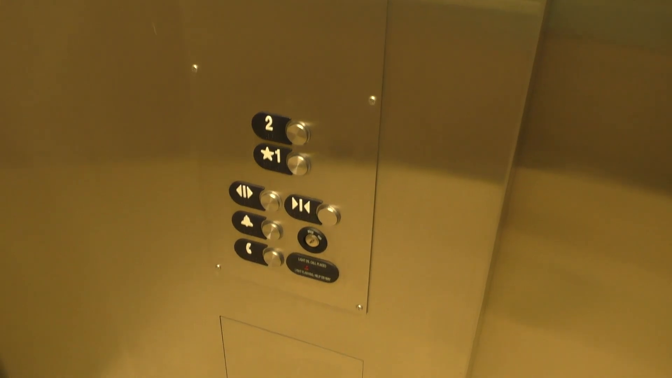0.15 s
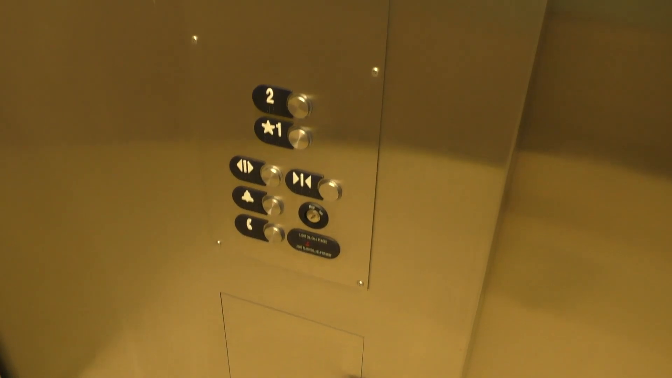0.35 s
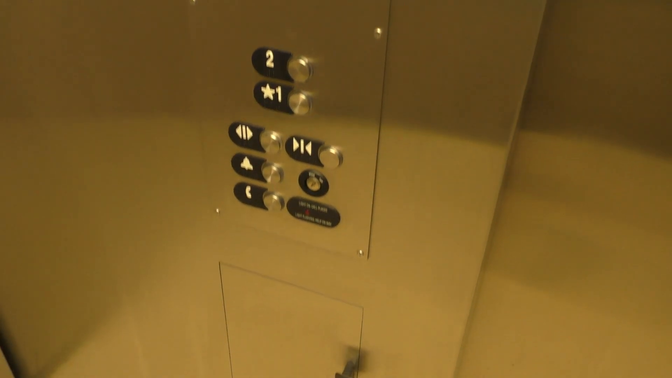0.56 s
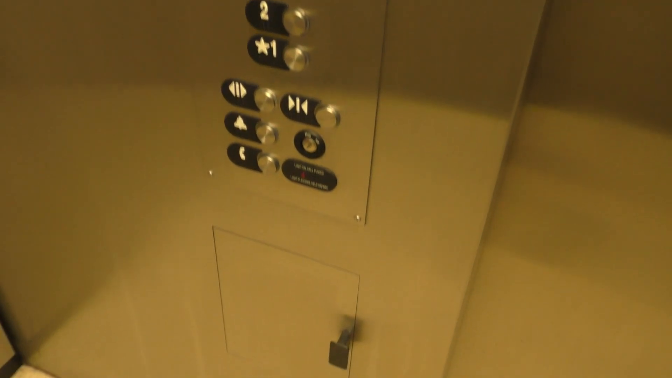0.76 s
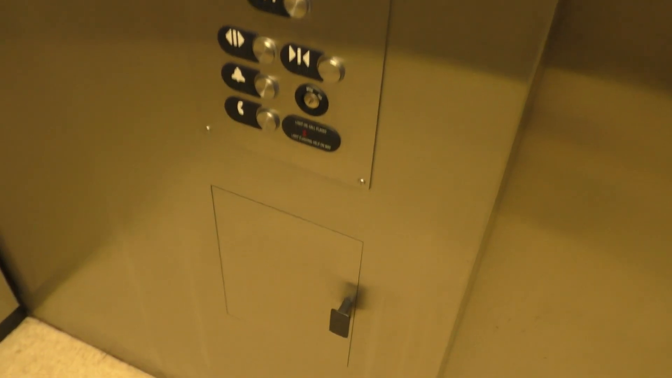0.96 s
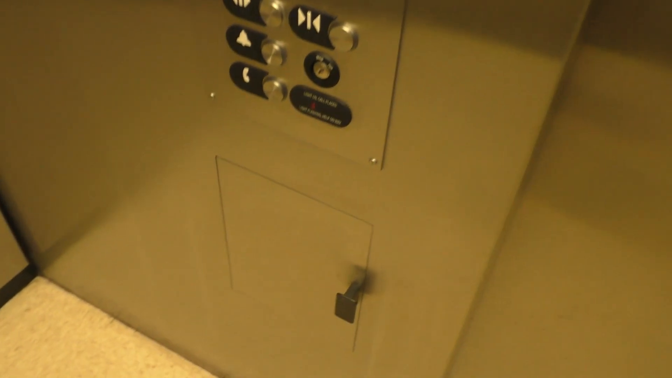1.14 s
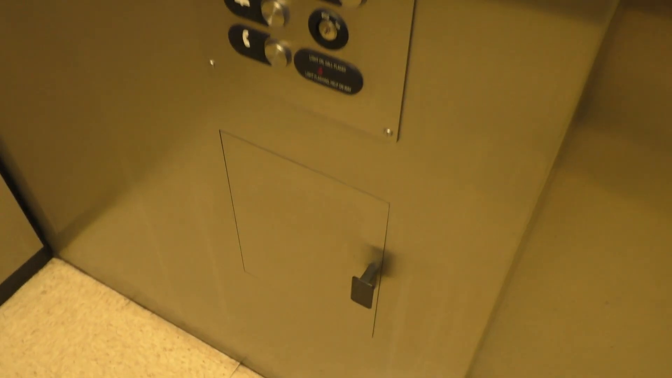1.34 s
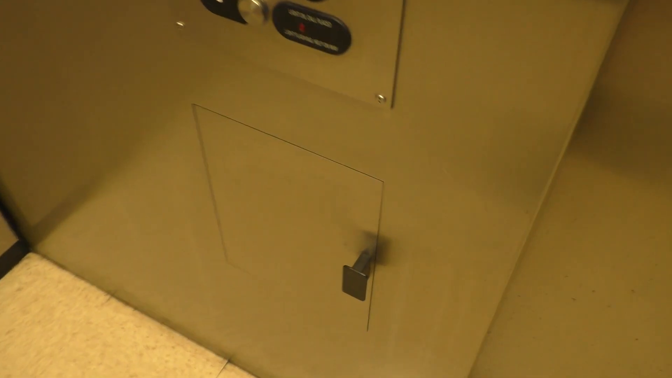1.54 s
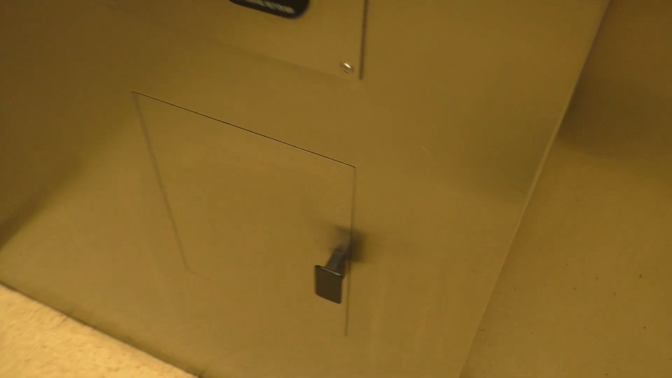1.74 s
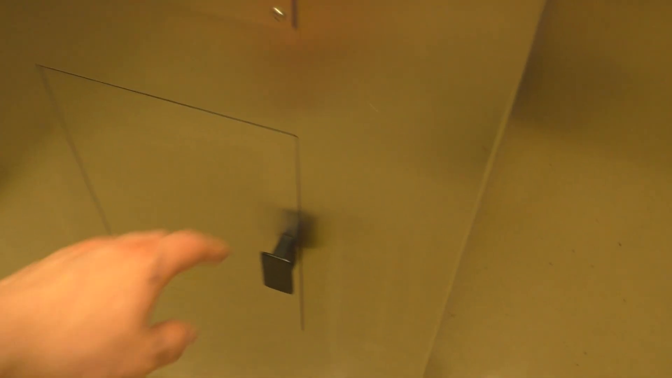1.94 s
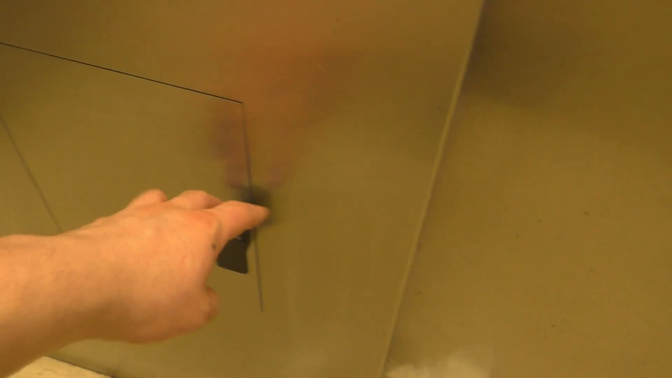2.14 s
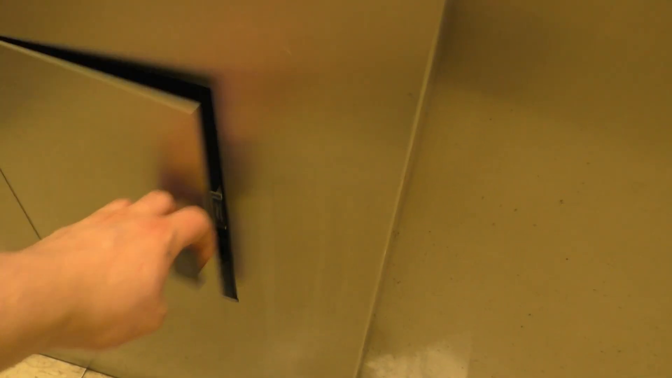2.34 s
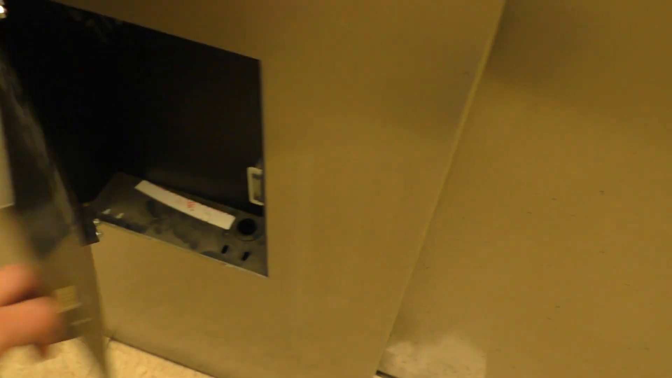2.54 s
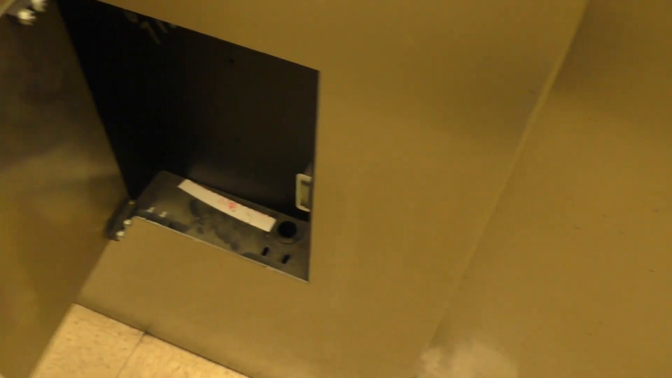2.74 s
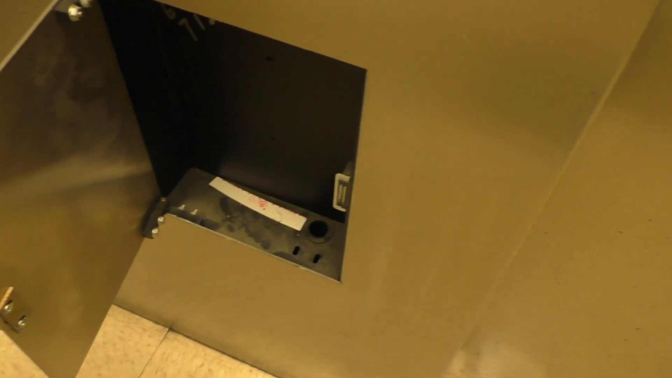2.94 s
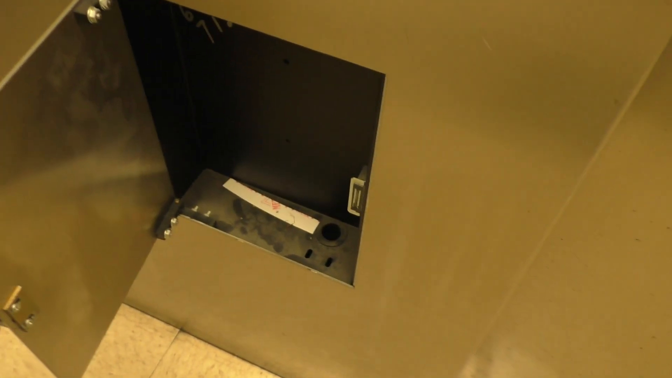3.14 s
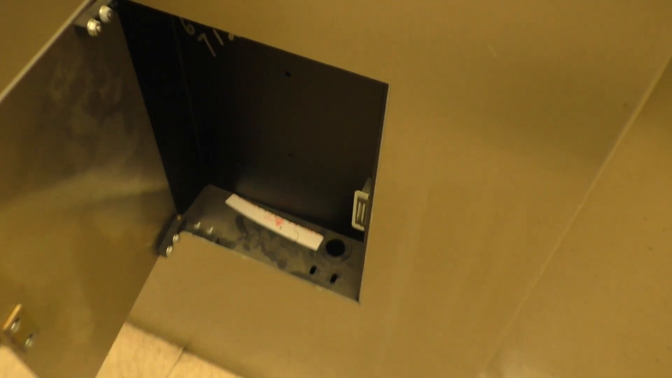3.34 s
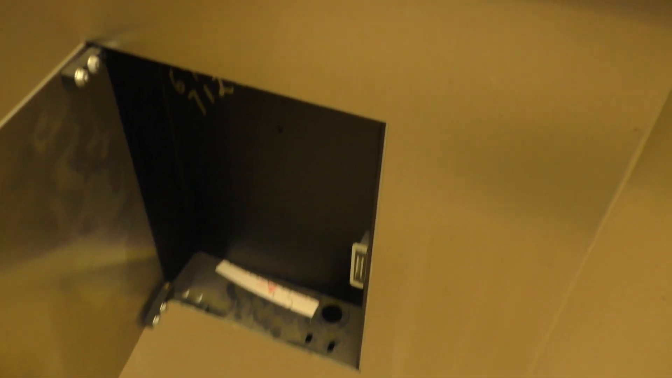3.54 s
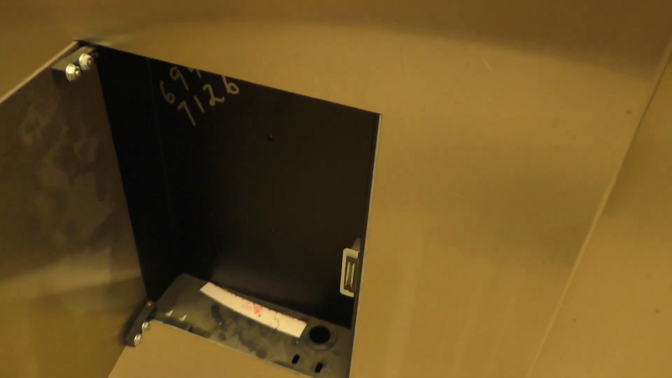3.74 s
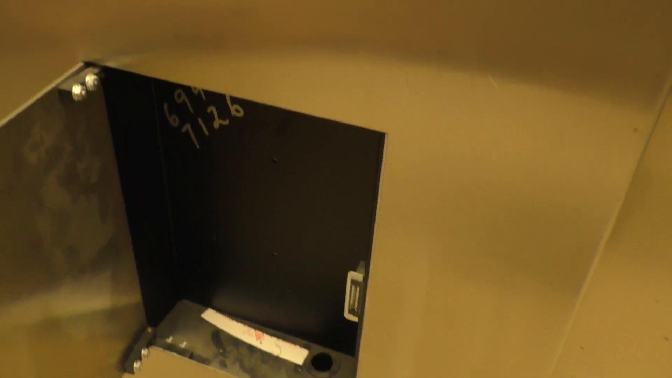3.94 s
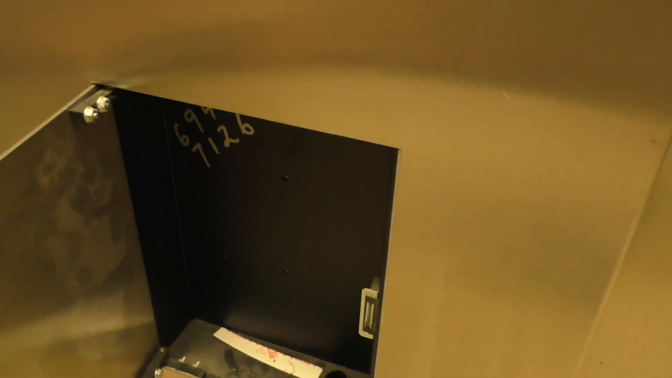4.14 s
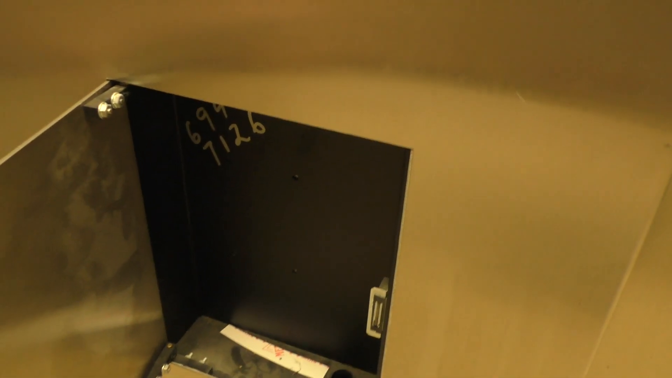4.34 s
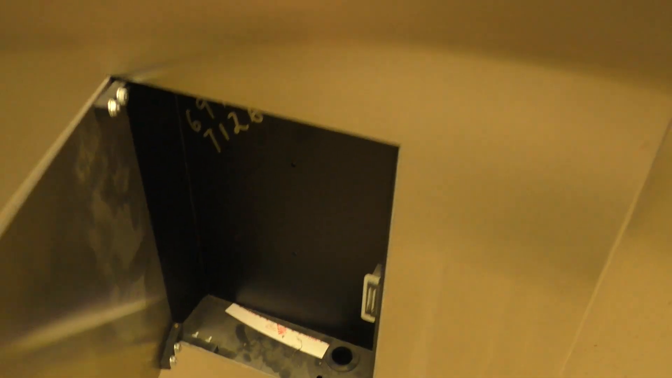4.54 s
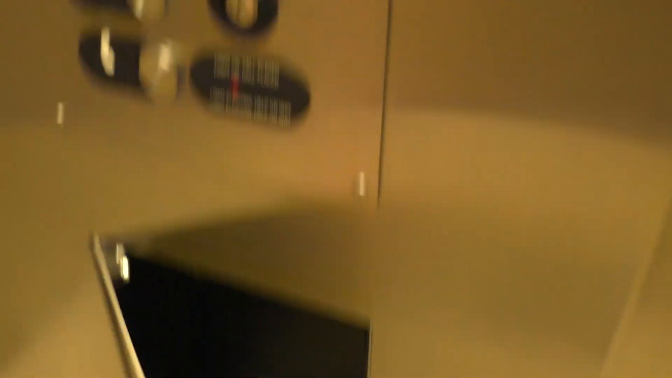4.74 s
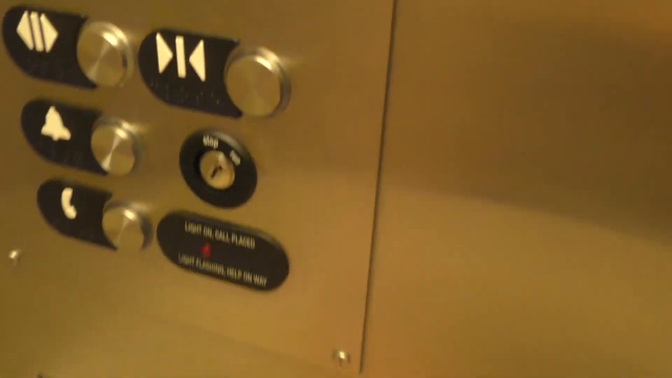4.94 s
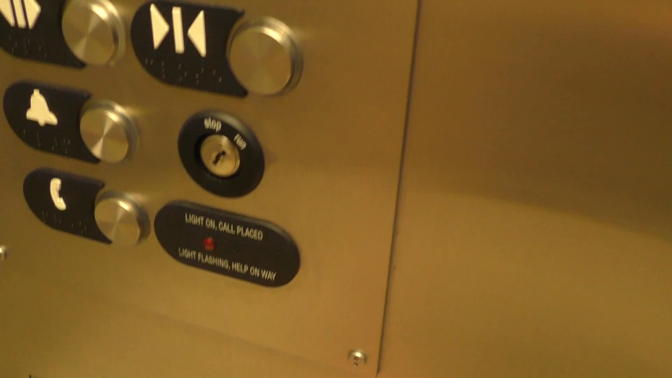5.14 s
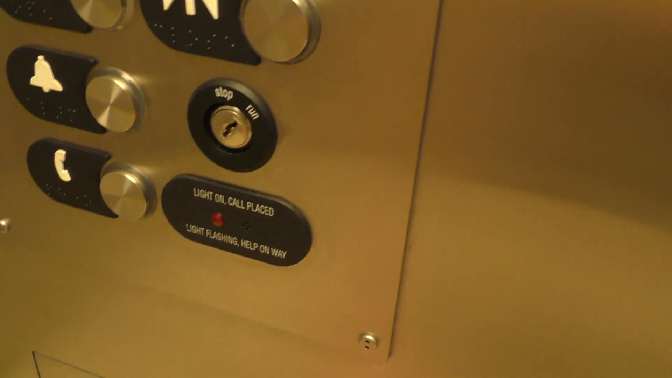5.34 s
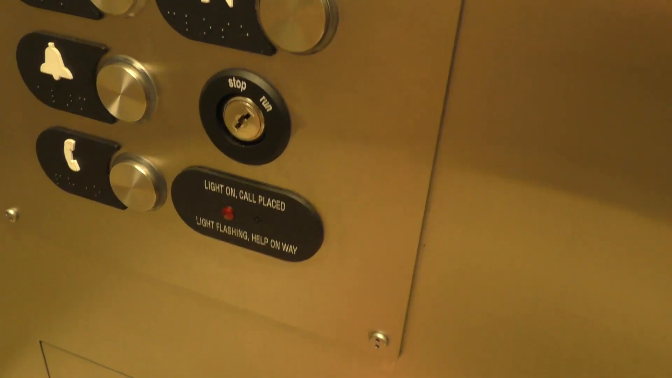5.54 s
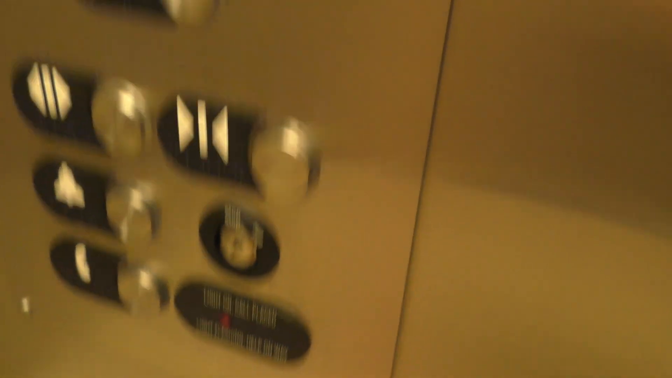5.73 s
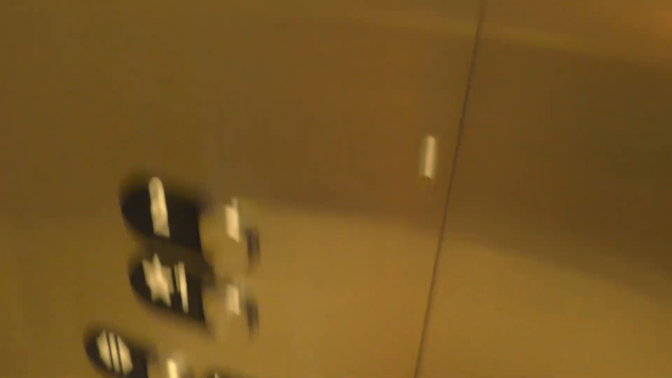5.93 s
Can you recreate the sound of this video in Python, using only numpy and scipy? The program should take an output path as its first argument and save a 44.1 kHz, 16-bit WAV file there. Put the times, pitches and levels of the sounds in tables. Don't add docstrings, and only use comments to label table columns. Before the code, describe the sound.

Faint fan hum, shaft rumble and slight microphone hiss fill a reverberant metal lift car. Early scuffs and a couple of hard foot knocks lead to a tiny catch click, then a thin steel cabinet door bursts loose with rapid hollow bangs and a clank. Only small taps, sleeve movement and dull camera handling bumps follow. Near the end comes a quick rough hinge squeak and a loud metallic slam with a fading ring, all within arm's reach.

```python
import sys
import numpy as np
from scipy import signal
from scipy.fft import rfft, irfft, next_fast_len
from scipy.io import wavfile
from scipy.ndimage import map_coordinates

SR = 44100
rng = np.random.default_rng(int(sys.argv[2]) if len(sys.argv) > 2 else 0)


def volts(x):
    e = np.asarray(x, float) / 20
    return 10 ** e


def unload_audio(sound):
    columns = np.transpose(np.atleast_2d(sound))
    steps = np.round(np.clip(columns, -1, 1) * 32767)
    wavfile.write(sys.argv[1], SR, steps.astype(np.int16))


N = 268304
ECHO = 31500
TOP_HZ = 16300
HISS_DB = -65
AIR_PAN_DB = -1
RUMBLE_DB, RUMBLE_FOLLOWS = -50, 0.21
CLOTH_DB, CLOTH_FOLLOWS = -74, 1.17
STICK_S, STICK_DB = .0021, -12

# (time [s], level [dB])
STIR = [(0, -47), (.12, -52), (.3, -49), (.8, -60), (.87, -56.5), (1.1, -62), (1.16, -56.5), (1.3, -58),
        (1.72, -51.5), (2.07, -55), (2.2, -50.5), (3.25, -62.5), (3.4, -64.5), (3.6, -62.5), (4.55, -63.5),
        (4.67, -59.5), (4.76, -61.5), (5.15, -58)]
# (time [s], peak level [dB], rise [s], fall [s])
RUSTLES = [
    (.02, -71, 0.016, 0.066),
    (.87, -77, 0.062, 0.036),
    (.982, -76, 0.032, .1),
    (1.158, -61, 0.036, .12),
    (1.66, -62, 0.51, 1),
    (2.2, -74, 0.033, 0.22),
    (3.599, -72, 0.21, 0.9),
    (3.95, -81, .08, .08),
    (4.7, -74, .015, 0.1),
    (5.12, -75, 0.68, 0.69),
]
# (frequency [Hz], level [dB])
HUM = [(118.4, -60), (253.0, -66.5), (360.7, -67.5), (2401, -87), (2519, -84), (4678, -86.5),
       (10966, -86.5), (11693, -86), (12425, -94.5), (15703, -93)]
# (frequency [Hz], density [dB per Hz])
RUMBLE = [(8.8, -34), (15, 6), (42, 0), (86, -7.5), (122, -4.5), (150, -12.5), (251, -13), (282, -17),
          (500, -26), (650, -62.5), (1100, -120)]
# (frequency [Hz], density [dB per Hz])
SHUFFLE = [(120, -31), (200, 5), (302, -21), (353, 0.5), (407, -9), (519, -4.5), (565, -6), (971, -9.5),
           (6000, -29), (7800, -56), (13200, -120)]
# (frequency [Hz], density [dB per Hz])
CLOTH = [(1500, -10), (3000, -4.5), (9000, -6.5), (12000, -19), (16000, -36)]
# (frequency [Hz], density [dB per Hz])
HISS = [(350, -29), (600, 0), (884, -13), (934, -33), (2170, -14), (2460, -19.5), (3330, -17.5),
        (11400, -14), (16300, -11)]

# (frequency [Hz], likeness [-1 to 1])
AIR_LIKENESS = [(60, 0.36), (240, 0.38), (950, 0.8), (3770, 0.46), (15000, 0.05)]
# (frequency [Hz], likeness [-1 to 1])
WALL_LIKENESS = [(60, -0.024), (120, 0.72), (240, 0.59), (480, 0.67), (950, 0.67), (1890, 0.81),
                 (3770, 0.5), (7520, 0.29), (15000, -0.3)]
# (frequency [Hz], t60 [s])
CAR = [(60, 1), (160, 0.92), (420, 1), (1100, 0.78), (2900, 0.51), (7700, 0.52), (14000, 0.27)]
# (low edge [Hz], high edge [Hz])
BANDS = [(60, 300), (400, 1500), (2000, 5000), (6000, 14000)]
SPREAD = [-1.5, -.3, .25, 1.2]

# (time [s], peak level [dB], weight [dB], edge [dB], contact length [s])
SCUFFS = [(.038, -40.5, -10, -36, 0.053), (.203, -39.5, -10, -43, 0.0049), (.334, -25, -23.5, -11, .017),
          (.379, -23.5, -13, -15.5, 0.016), (.439, -28.5, -1, -22, 0.0054), (.564, -51, 13, 6.5, 0.011),
          (1.249, -52, 10.5, 1, 0.013), (1.334, -54.5, -12, 2, .015), (1.47, -52, -20, -1, .03),
          (1.588, -56, -8, 3, .004), (1.645, -43, 4.5, -2.5, 0.0054), (2.129, -44, -36, -2.5, 0.015),
          (2.209, -46, -6, 3.5, .0069), (4.704, -45, -12, -67, 0.027), (5.129, -49, 1, -27, .015),
          (6.021, -42, -9, -8.5, 0.012)]
# (time [s], peak level [dB], weight [dB], edge [dB], contact length [s])
SCRAPES = [
    (.395, -38, -5, -14, .01),
    (1.39, -55, -10, -14, 0.016),
    (1.478, -53, -8, -12, 0.011),
    (1.512, -50, -10, -14, .012),
    (1.555, -56, -10, -14, .01),
]
# (time [s], peak level [dB], weight [dB], edge [dB], contact length [s])
KNOCKS = [
    (.973, -42, -13, -18, 0.021),
    (1.149, -49.5, -9, 3, 0.024),
    (1.374, -38.5, -38, -39, 0.0022),
    (1.606, -28.5, -31, -30, 0.0011),
    (3.038, -55.5, -15, -6, .0025),
    (3.29, -53, -14, -51, .003),
    (3.558, -62, 35, -26, 0.0034),
    (4.669, -49, 9, 0, 0.004),
    (4.8, -47.5, -9, -44, 0.0046),
]
# (time [s], peak level [dB], weight [dB], edge [dB], contact length [s])
JOLTS = [
    (1.25, -63, 24, -30, 0.018),
    (1.36, -60, 24, -30, 0.014),
    (1.6, -53, 24, -30, .02),
    (1.68, -56.5, 23, -30, 0.013),
    (2.64, -49, 28, -30, 0.027),
    (3.3, -62, 26, -30, .02),
    (3.55, -57, 29, -30, 0.0074),
    (5.26, -58, 22, -32, 0.023),
]
# (time [s], peak level [dB], weight [dB], edge [dB], contact length [s])
HEEL = [
    (1.623, -37.5, -10, -26, .002),
    (1.652, -37, -12, -33, 0.0033),
]
# (time [s], peak level [dB], weight [dB], edge [dB], contact length [s])
CATCH = [
    (2.2605, -35, -2, 1, 0.0011),
    (2.52, -46, -13.5, 8.5, .004),
]
# (time [s], peak level [dB], weight [dB], edge [dB], contact length [s])
POP = [
    (2.341, -43, 9, -20, .0076),
    (2.367, -28.5, -14, -40, 0.011),
    (2.378, -24, -11, -41, .004),
    (2.3825, -13.5, -16, -12.5, .003),
    (2.39, -10, -23, -16, 0.0062),
    (2.396, -6.5, -19, -39.5, 0.0075),
    (2.424, -7, -21, -40.5, 0.0028),
    (2.448, -11.5, -7.5, -28.5, 0.017),
    (2.518, -13.5, -5, -34.5, 0.005),
]
# (time [s], peak level [dB], weight [dB], edge [dB], contact length [s])
SHIFTS = [
    (2.62, -46, 7, -42, 0.028),
    (5.02, -55, 13, -40, .02),
    (5.2, -58, 21, -40, 0.047),
]
# (time [s], peak level [dB], weight [dB], edge [dB], contact length [s])
STOP = [
    (2.729, -28.5, -3.5, 0, 0.00082),
    (2.763, -22, -4, -28.5, 0.03),
    (2.909, -44, 0, -35, .004),
    (4.841, -55.5, 17, 9.5, 0.0045),
    (4.96, -65, 17, 14, 0.006),
]
# (time [s], slip rate [Hz], level [dB])
HINGE = [
    (5.273, 685, -52),
    (5.283, 648, -38),
    (5.294, 680, -30),
    (5.308, 701, -25),
    (5.338, 672, -29),
    (5.36, 695, -21),
    (5.38, 635, -17),
    (5.43, 625, -23),
    (5.512, 628, -25),
]
STICKS = [5.2875, 5.3, 5.326, 5.341, 5.371, 5.389, 5.404, 5.441, 5.458, 5.472]
# (time [s], partial [multiple],
# level [dB], half length [s])
GRIPS = [(5.282, 2, -58, .003), (5.285, 3, -50, .005), (5.293, 3, -45, .005), (5.296, 2, -46, .006),
         (5.295, 3.9, -53, .004), (5.305, 3.8, -52, .004), (5.318, 2, -37, .006), (5.322, 3, -38, .004),
         (5.322, 4.6, -52, .004), (5.329, 2, -38, .003), (5.33, 4, -50, .01), (5.326, 7, -62, .008),
         (5.333, 3, -44, .005), (5.345, 2, -36, .007), (5.346, 3, -45, .004), (5.362, 3.4, -42, .004),
         (5.39, 4.3, -38, .003)]
# (time [s], peak level [dB], weight [dB], edge [dB], contact length [s])
TOUCH = [
    (5.355, -19, -3, -33, .008),
    (5.365, -16, -8, -40, .008),
    (5.3735, -16, -19, -6.5, 0.0044),
    (5.392, -13.5, -2.5, -25, 0.0055),
    (5.445, -29, -11, -27, .006),
]
# (time [s], peak level [dB], weight [dB], edge [dB], contact length [s])
SLAM = [
    (5.5135, -14, -64, 0, 0.012),
    (5.517, -14, -16, -18.5, 0.019),
    (5.522, -3.5, -19.5, -7, 0.0023),
    (5.56, -8.5, -6.5, -23, .006),
]

# (frequency [Hz], level [dB], t60 [s])
FLOOR = [(119, -10, 1.7), (171.7, -1, 1.25), (407, 2.5, 0.52), (508, -15, 1.8), (554, 2, 0.25),
         (683, -1, 0.75), (777, -5.5, 0.43)]
# (frequency [Hz], level [dB], t60 [s])
SILL = [(1030, -6, .25), (1340, -8, .3), (1560, -12, .2), (2700, -18, .2)]
# (frequency [Hz], level [dB], t60 [s])
WALLS = [(112, -4, .4), (281, -3, .75), (462, -2, .35), (511, -14, .6), (616, -8, .7), (701, -7, .7),
         (805, -13, .6), (1001, -8, .55), (1270, -8, .5), (1464, -17, .5), (1900, -22, .45),
         (2067, -15, .2), (2600, -21, .3), (2950, -20, .25)]
# (frequency [Hz], level [dB], t60 [s])
DOOR = [(180, -3, .6), (284, -9, .9), (495, -13, 1), (1384, -12, .6), (1690, -5, .65), (1880, -12, .3),
        (2040, -10, .2), (2730, -3, .25), (3240, -15, .4), (3400, -4, .15), (4020, -16, .4),
        (4300, -14, .5), (5570, -16, .35), (6570, -18, .3)]
# (frequency [Hz], level [dB], t60 [s])
FRAME = [(113, -7, .4), (300, -8, .5), (459, -8, .8), (578, -12, .6), (624, -10, .35), (870, -8, .7),
         (1020, -12, .3), (1283, -15, .6), (1497, -22, .6), (1750, -18, .15), (3480, -27, .2),
         (4165, -27, .5), (4775, -29, .45)]
# (frequency [Hz], density [dB per Hz])
THUD = [(24, -41), (40, -12), (134, -13), (168, -11), (264, -3), (307, -2.5), (721, -9.5), (882, -9.5),
        (9620, -41), (16300, -42.5)]
# (frequency [Hz], density [dB per Hz])
GRIT = [(60, -30), (500, -14), (1500, 0), (2300, 1), (3000, -10), (4200, -16), (16300, -45)]
# (frequency [Hz], density [dB per Hz])
JOLT = [(24, 14), (70, 20), (110, 2), (400, 2), (1500, -30), (16300, -80)]
# (frequency [Hz], density [dB per Hz])
TICK = [(59, -33), (100, 2), (297, 7.5), (464, -14), (1600, -18.5), (1940, -14.5), (2500, -16), (3750, -8),
        (5620, -24.5), (6670, -18), (12100, -33.5), (15000, -28), (16300, -41)]
# (frequency [Hz], density [dB per Hz])
STEEL = [(24, -59), (40, -6), (107, -6), (221, -2.5), (277, 0), (415, -15.5), (459, 1.5), (561, -9.5),
         (704, -1.5), (1290, -15.5), (1650, -19.5), (8700, -45.5), (14400, -59), (16300, -78)]
# (frequency [Hz], density [dB per Hz])
CLANK = [(24, -51), (40, -12), (186, -3), (245, -25), (284, -1), (348, -9), (482, 2), (1460, -9),
         (1700, -9.5), (2290, -12), (4200, -16.5), (5000, -27), (5670, -21), (16300, -53)]
# (frequency [Hz], density [dB per Hz])
BANG = [(24, -38), (40, -8.5), (109, -1.5), (339, 1), (447, 3), (507, -1.5), (882, -2.5), (2350, -23),
        (8490, -26.5), (14400, -36), (16300, -39.5)]


def unit(x):
    return x / np.sqrt(np.mean(x ** 2) + 1e-20)


def along(points, hz):
    f, v = np.transpose(points)
    return np.interp(np.log(hz + 1), np.log(f + 1), v)


def curves(rows):
    s, *columns = np.transpose(rows)
    return [np.interp(np.arange(N) / SR, s, column) for column in columns]


def wobble(rate):
    coarse = np.arange(0, N + 16, 16)
    knots = rng.standard_normal(int(N * rate / SR) + 4)
    return np.interp(np.arange(N), coarse, map_coordinates(knots, [coarse * rate / SR]))


def stereo(pair, gain, alike):
    n = pair.shape[1]
    hz = np.fft.rfftfreq(n, 1 / SR)
    turn = np.arccos(np.clip(along(alike, hz), -1, 1)) / 2
    mid, side = irfft(rfft(pair) * gain(hz) * [np.cos(turn), np.sin(turn)], n)
    return np.array([mid + side, mid - side])


def rush(spectrum):
    pair = rng.standard_normal((2, N))
    pair = np.pad(pair, ((0, 0), (0, next_fast_len(N, True) - N)))
    return unit(stereo(pair, lambda hz: volts(along(spectrum, hz)), AIR_LIKENESS)[:, :N])


def background():
    stir_db, = curves(STIR)
    swing_db = stir_db - stir_db.mean()
    t = np.arange(N) / SR
    brush = 0
    for s, db, rise, fall in RUSTLES:
        brush = brush + volts(db - 20 * np.where(t < s, (s - t) / rise, (t - s) / fall))
    rumble_db = RUMBLE_DB + RUMBLE_FOLLOWS * swing_db + 2.2 * wobble(17) + 0.91 * wobble(4.12)
    rumble = volts(rumble_db) * rush(RUMBLE)
    shuffle = volts(stir_db + 0.56 * wobble(11)) * rush(SHUFFLE)
    cloth_level = volts(CLOTH_DB + CLOTH_FOLLOWS * swing_db) + brush
    cloth = cloth_level * volts(1.24 * wobble(16)) * rush(CLOTH)
    hum = 0
    for hz, db in HUM:
        level = volts(db + 4.5 + 1.36 * wobble(6.6))
        hum = hum + level * np.sin(2 * np.pi * hz * t + 1.49 * wobble(14))
    pan = volts(np.array([[.5], [-.5]]) * AIR_PAN_DB)
    return pan * (rumble + shuffle + cloth + hum) + volts(HISS_DB) * rush(HISS)


def ring(modes, colour, split_hz):
    t = np.arange(ECHO) / SR
    hz, db, t60 = np.transpose(modes)[..., None]
    places = np.reshape(SPREAD, (4, 1, 1)) + .2 * rng.standard_normal((4, len(modes), 1))
    offsets = (split_hz + .006 * hz) * places
    cluster = np.exp(2j * np.pi * (hz + offsets) * t).sum(axis=0) / 2
    return volts(db - along(colour, hz) - 60 * t / t60) * cluster


def car():
    hz, frame, z = signal.stft(rng.standard_normal((2, ECHO)), SR, nperseg=256)
    decay = volts(-60 * frame / along(CAR, hz)[:, None])
    tail = signal.istft(z * decay, SR, nperseg=256)[1][:, :ECHO]
    return tail * (1 - np.exp(-np.arange(ECHO) / SR / 0.00022))


def strikes(events, colour, modes, direct_db, crack_db, ring_db, clack_db, follows, soft=False):
    lead = 900
    out = np.zeros((2, N + SR))
    centres = np.sqrt(np.prod(BANDS, axis=1))
    usual = along(colour, centres) + 10 * np.log10(np.diff(BANDS)[:, 0])
    panels = ring(modes, colour, split_hz=2.81)
    fade_in = np.clip(np.arange(-lead, ECHO) / 20 + 1, 0, 1)
    fade_out = np.clip(np.arange(ECHO + lead)[::-1] / 8000, 0, 1)
    body_band = signal.butter(2, BANDS[1], "band", fs=SR, output="sos")
    for s, db, weight_db, edge_db, length in events:
        u = np.arange(ECHO) / SR / max(length, 2e-4)
        force = np.exp(-u) * u ** soft
        force[0] = volts(crack_db)
        force /= np.linalg.norm(force)
        luck = rng.standard_normal((2, 2, len(modes)))
        strengths = volts(2 * luck[0]) * np.exp(1j * luck[1])
        sound = car() + volts(ring_db) * (strengths @ panels).imag
        sound *= np.sqrt(np.cumsum(force ** 2))
        sound[0] += volts(direct_db) * force * np.append(1, rng.standard_normal(ECHO - 1))

        balance_db = [weight_db, 0, clack_db + follows * edge_db, edge_db]
        own = np.transpose([centres, balance_db - usual + usual[1]])
        sound = np.pad(sound, ((0, 0), (lead, 0)))
        sound = stereo(sound, lambda hz: volts(along(colour, hz) + along(own, hz)), WALL_LIKENESS)
        sound *= fade_in * fade_out
        body = signal.sosfilt(body_band, sound[:, :SR // 8])
        level = volts(db - 14.5) / np.sqrt(np.mean(body ** 2))
        out[:, round(s * SR):][:, :ECHO + lead] += level * sound
    return out[:, lead:N + lead]


def scuffs():
    return strikes(SCUFFS, THUD, FLOOR, direct_db=26.0, crack_db=-33, ring_db=-24.5,
                   clack_db=5.0, follows=1.0, soft=True)


def scrapes():
    return strikes(SCRAPES, GRIT, SILL, direct_db=26.5, crack_db=-33, ring_db=-35,
                   clack_db=5.5, follows=.12, soft=True)


def knocks():
    return strikes(KNOCKS, THUD, FLOOR, direct_db=26.5, crack_db=-10, ring_db=-35.5,
                   clack_db=5.5, follows=0.45)


def jolts():
    return strikes(JOLTS, JOLT, FLOOR[:1], direct_db=29, crack_db=-33, ring_db=-40.5,
                   clack_db=0, follows=.9, soft=True)


def heel():
    return strikes(HEEL, THUD, SILL, direct_db=29.0, crack_db=-10.5, ring_db=-11,
                   clack_db=4, follows=0.22)


def catch():
    return strikes(CATCH, TICK, FLOOR, direct_db=26.0, crack_db=23.0, ring_db=-46,
                   clack_db=3.0, follows=0.51)


def pop():
    return strikes(POP, STEEL, WALLS, direct_db=28.5, crack_db=-15.0, ring_db=-18.0,
                   clack_db=-5.5, follows=0.4)


def shifts():
    return strikes(SHIFTS, THUD, FLOOR[:1], direct_db=0, crack_db=-33, ring_db=-5.0,
                   clack_db=-4, follows=.9, soft=True)


def stop():
    return strikes(STOP, CLANK, DOOR, direct_db=28.5, crack_db=-7, ring_db=-16.5,
                   clack_db=6.0, follows=0.33)


def hinge():
    slip_hz, level_db = curves(HINGE)
    t = np.arange(N) / SR
    phase = 2 * np.pi * np.cumsum(slip_hz * (1 + .022 * wobble(500))) / SR
    moving = (t > HINGE[0][0]) & (t < HINGE[-1][0])
    stall_db = STICK_DB * sum(np.exp(-((t - s) / STICK_S) ** 2) for s in STICKS)
    squeak = volts(level_db + 2 + stall_db + 1.5 * wobble(120)) * np.sin(phase)

    overtones, grip = 0, 0
    for s, partial, db, half in GRIPS:
        swell = volts(db + 3) * np.exp(-((t - s) / half) ** 2 / 2)
        overtones = overtones + swell * np.sin(partial * phase)
        grip = grip + swell
    squeak += volts(2.5 * wobble(400)) * overtones

    grit_band = signal.butter(4, (900, 3300), "band", fs=SR, output="sos")
    grit = signal.sosfilt(grit_band, rng.standard_normal(N))
    squeak = moving * (squeak + volts(-9.5) * grip * grit * (1 + np.cos(phase)))

    echo = stereo(car(), lambda hz: 1, WALL_LIKENESS)
    echo /= np.linalg.norm(echo[0])
    return squeak + volts(-11) * signal.fftconvolve(squeak[None], echo, axes=1)[:, :N]


def touch():
    return strikes(TOUCH, BANG, FRAME[:5], direct_db=28, crack_db=-1, ring_db=-16.0,
                   clack_db=-9, follows=0.14)


def slam():
    return strikes(SLAM, BANG, FRAME, direct_db=27.0, crack_db=9.5, ring_db=-11.0,
                   clack_db=-5, follows=0.46)


def scene():
    shoes = scuffs() + scrapes() + knocks() + heel()
    opening = catch() + pop() + stop()
    closing = hinge() + touch() + slam()
    return background() + shoes + jolts() + opening + shifts() + closing


def top_cut(x):
    return signal.sosfilt(signal.butter(12, 16470, fs=SR, output="sos"), x)


def record(dry):
    clipped = dry / (1 + np.abs(dry) ** 12) ** (1 / 12)
    low_pass = signal.butter(12, TOP_HZ, fs=SR, output="sos")
    mix = signal.sosfiltfilt(low_pass, clipped)
    return top_cut(mix)


dry = scene()
out = record(dry)
unload_audio(out)
```